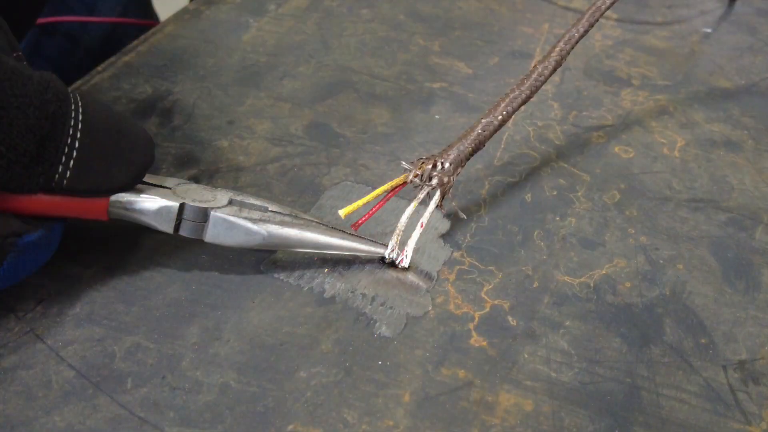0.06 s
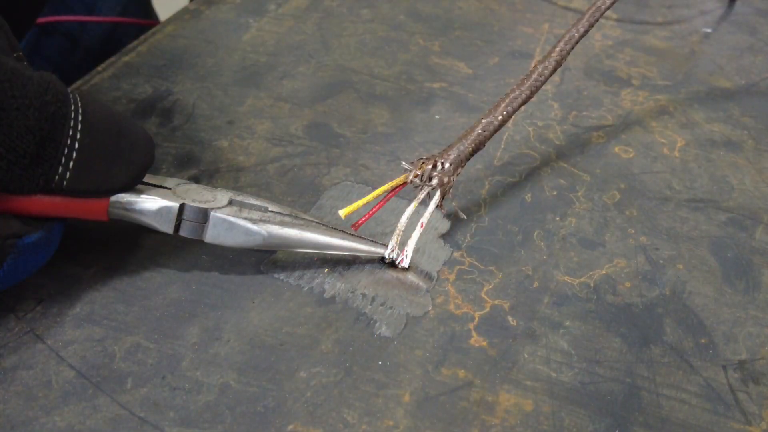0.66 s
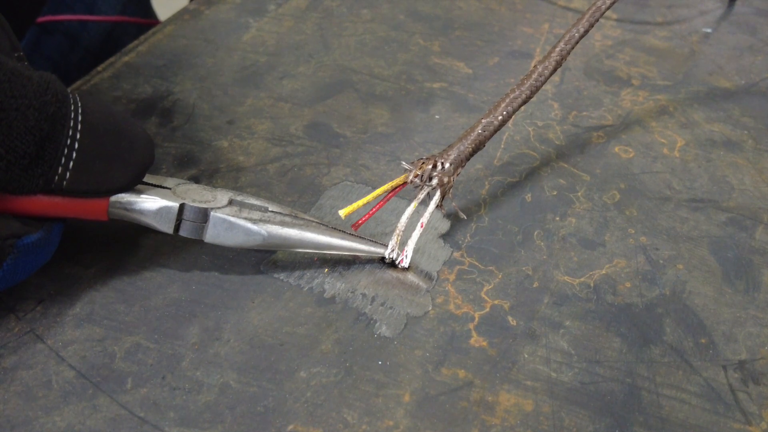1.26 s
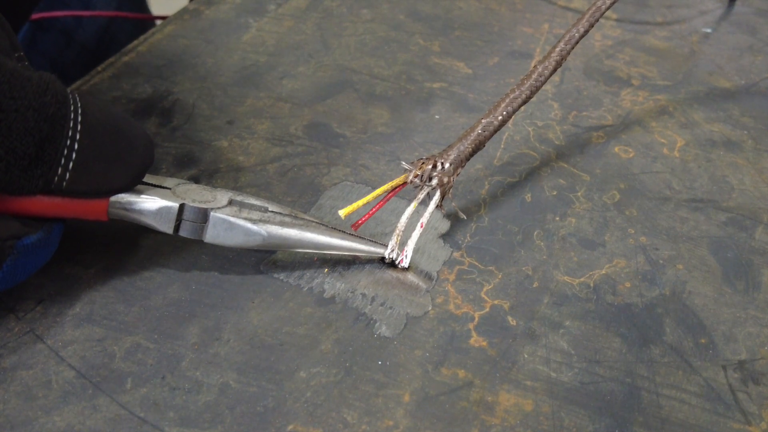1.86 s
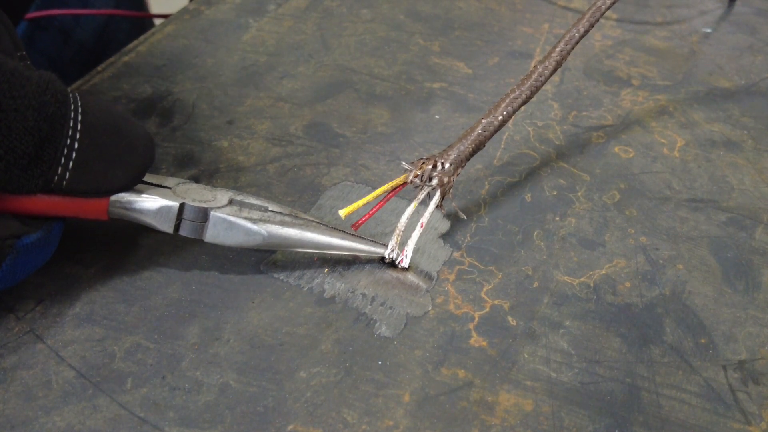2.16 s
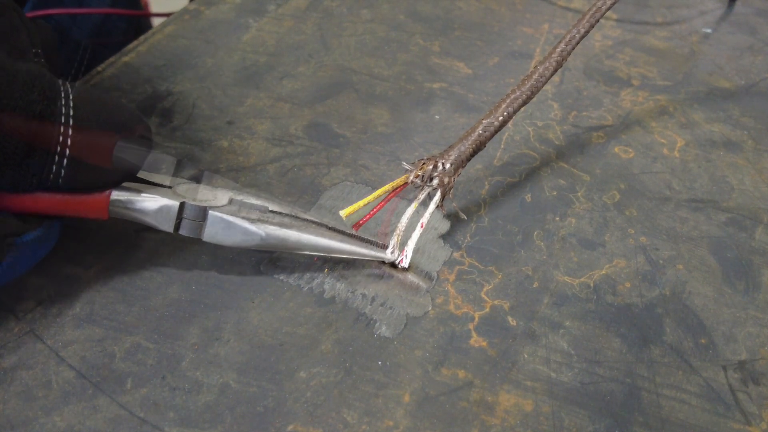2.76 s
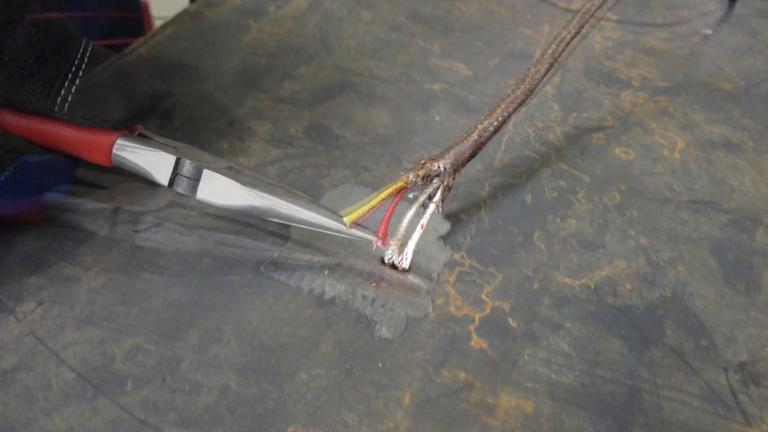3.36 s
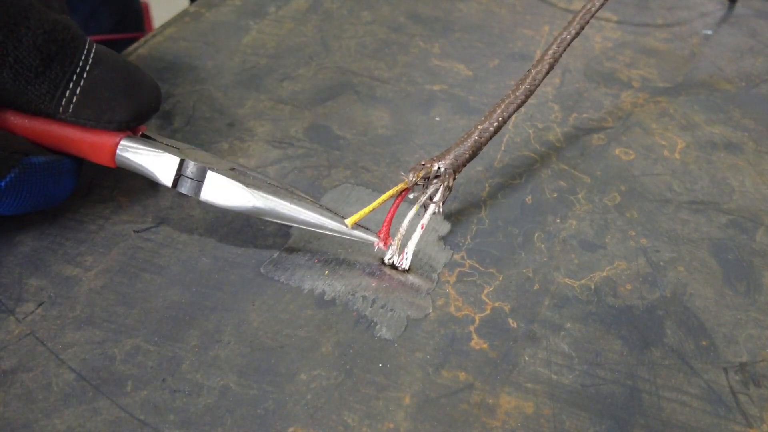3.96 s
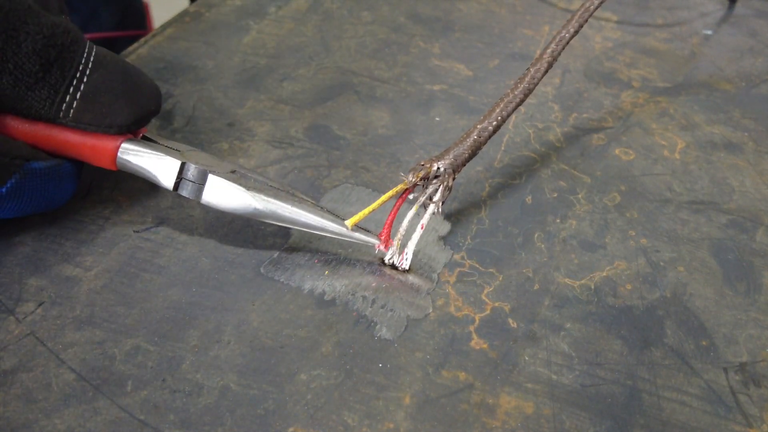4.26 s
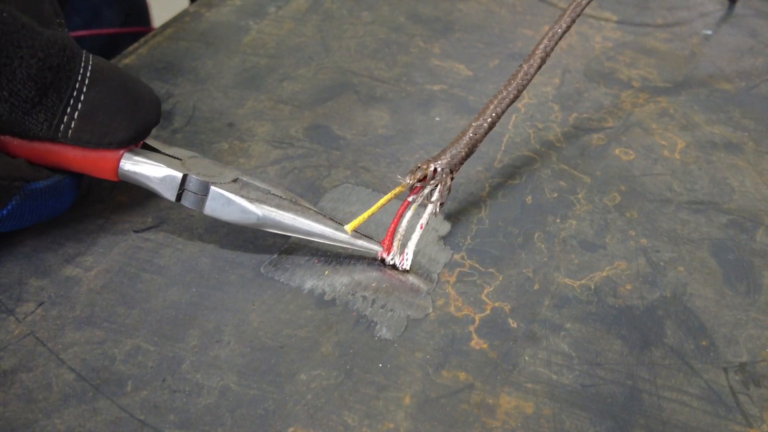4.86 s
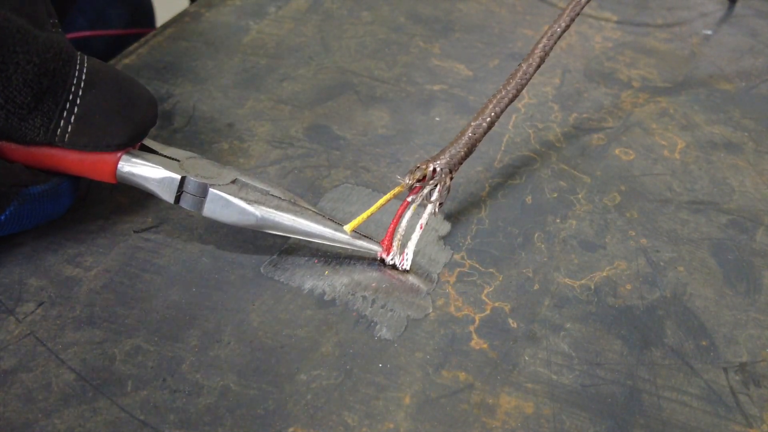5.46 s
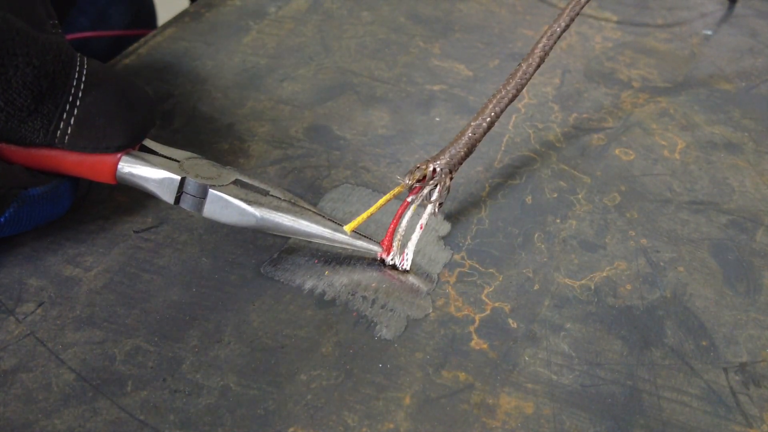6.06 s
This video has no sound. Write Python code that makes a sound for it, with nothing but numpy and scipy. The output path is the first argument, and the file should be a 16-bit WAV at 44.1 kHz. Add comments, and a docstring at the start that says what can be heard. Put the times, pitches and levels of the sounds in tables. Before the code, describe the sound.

The sound opens on the echo of a welder's crack, without the crack itself, dying away in a workshop within about a second. Underneath, a fan and other machines keep up a steady low rumble and hum with a soft rush of air throughout. From about 1.5 to 3.2 seconds the welder's charger gives a very faint, thin, high whine. At 2.9 seconds steel pliers release a wire close by with a sharp click, the most prominent sound, and a brief scraping hiss. Two lighter, brighter clicks follow at about 3.5 and 3.7 seconds as the jaws grip the next wire, with faint rubbing. The fan carries on almost alone until about 5.4 seconds, when the wire is pressed onto a steel plate: a soft, short ringing tone swells, with a tiny high metallic squeak at 5.5 seconds, and fades into the hum by 6 seconds.

```python
"""A capacitor discharge welder has just fired: its crack reverberates and dies away in a workshop.
The charger's coil whines faintly while the capacitors refill. Steel pliers let go of the welded wire
and grip the next: impacts excite their modes as clicks, and friction hisses. They set the wire on a
steel plate, which hums as stick-slip motion makes a small ringing squeak. Under it all a fan rumbles,
rushes and hums at multiples of its turning rate, beside the tones of other machines."""
import sys
import numpy as np
from scipy import signal
from scipy.fft import rfft, irfft, next_fast_len
from scipy.io import wavfile
from scipy.ndimage import map_coordinates

SR = 44100
rng = np.random.default_rng(int(sys.argv[2]) if len(sys.argv) > 2 else 0)


def store_wav(level_fs):
    """Save 16-bit WAV to argv[1]."""
    pcm = np.round(np.clip(np.atleast_2d(level_fs), -1, 1) * 32767)
    wavfile.write(sys.argv[1], SR, pcm.T.astype(np.int16))


N = 274302

# spectra of the fan's rumble and of its rushing air: frequency_hz, relative_density_db
RUMBLE_SPECTRUM = [(10, -36), (20, 3.5), (42, 1), (56, -4.5), (72, -8.5), (86, -1), (112, -3), (135, -8.5),
                   (225, -8), (320, -14.5), (410, -18), (490, -16.5), (590, -22), (700, -67.5)]
AIR_SPECTRUM = [(550, 2.5), (715, 6.5), (830, 4), (1020, 3), (1100, 5), (1230, 2.5), (1830, -0.5),
                (2250, -12), (2850, -10), (3400, -16.5), (4700, -18), (8000, -23), (12000, -30),
                (13200, -60), (16000, -45)]
# stereo width of room noise: frequency_hz, side_minus_mid_db
ROOM_WIDTH = [(40, -17), (100, -30.5), (200, -7), (400, -7), (620, -2), (900, 4), (1130, 4), (1230, -9),
              (1800, -7), (2600, -2.5), (3500, 0.5), (6000, 0.3), (15000, 2)]
# balance of room noise: frequency_hz, left_minus_right_db
ROOM_BALANCE = [(45, -1), (125, 0.5), (500, 2.5), (1000, 4), (2000, 0.5), (12000, 0.5)]
# harmonics of the fan's rotation; five blades favour the fifth: multiple, level_db, left_minus_right_db
FAN_HARMONICS = [(1, -46, -0.5), (3, -63.5, -3.5), (5, -54, 2.5), (10, -71, 10), (15, -80.5, 10.5)]
# tones of other machines: pitch_hz, level_db, left_minus_right_db
MACHINE_TONES = [(21.7, -47.5, 2), (37.9, -46.5, -.5), (81.75, -55, -0.5), (92.8, -54.5, 5),
                 (110.6, -61, -1.5), (291.3, -65.5, 2), (1797, -78, -3)]
# strokes of glove, jaws and wire: peak_s, rise_s, fall_s, level_db, centre_hz, spread_octaves
FRICTION_STROKES = [(1.868, .022, .025, -76, 12000, .9), (2.2, 0.45, 0.46, -86, 8000, 2.5),
                    (2.56, .025, 0.028, -68, 9500, 1.7), (2.75, 0.33, 0.4, -76.5, 10000, 1.6),
                    (2.926, 0.024, 0.021, -60.5, 5000, 2.4), (2.949, 0.026, 0.022, -50.5, 1250, 0.85),
                    (2.987, 0.035, 0.024, -50.5, 10000, 1.4), (3.15, 0.065, 0.013, -67.5, 9000, 2.4),
                    (3.545, 0.025, 0.05, -71.5, 10000, 2.3), (3.6, 0.41, 0.2, -79, 8500, 1.2),
                    (4.59, .025, .02, -79, 10000, .6), (5.43, 0.45, 0.19, -72.5, 12500, 2.1),
                    (5.46, 0.028, 0.032, -58.5, 1360, 0.35), (5.51, 0.0032, .006, -56, 12000, .8),
                    (5.71, 0.12, 0.22, -70.5, 8000, 2.5)]
# modes of the gripped pliers and of the plate under them: pitch_hz, relative_db, t60_s
PLIER_MODES = [(2380, 3, .012), (2640, 2, .009), (4580, 1, .008), (4940, 1, .013), (5700, -9, .014),
               (6350, -3, .013), (7700, 2.5, .014), (8500, -3, .015), (9700, -3, .014), (10700, -2, .014),
               (12700, -3, .012), (14200, -4, .012), (15300, -6, .012)]
PLATE_MODES = [(656, 11.6, 0.028), (1216, 4.5, 0.03), (1420, 8.7, 0.034), (1730, 4, 0.017)]
# impacts of pliers and wire: start_s, level_db, centre_hz, spread_octaves, snap_gain_db,
# knock_gain_db, rebound_delay_s, rebound_gain_db
IMPACTS = [(.432, -69, 11500, .8, 0, -17, .003, -8), (1.195, -65, 5800, .55, 7, -20, .003, -8),
           (2.9215, -29, 3200, .66, -18, -23, .0035, -9), (2.9216, -40, 14500, .25, 6, -20, .002, -12),
           (3.301, -62, 10000, 1, 6, -20, .003, -6), (3.451, -35, 7000, .55, 0, -16, .0025, -11),
           (3.6465, -37.5, 7900, .85, 5, -10.5, .0024, -5)]
# the plate's mode that hums under the wire: pitch_hz, level_db, t60_s
PLATE_HUM_MODES = [(615, -42.5, 0.43)]
# partials of the squeak: multiple, level_db, jitter_fraction
SQUEAK_PARTIALS = [(2, -61, .08), (3, -50, .026), (4.42, -65.5, .035), (5.1, -66, .03), (6, -66, .03),
                   (6.85, -69, .04)]
# tones of the charger: start_s, end_s, pitch_hz, midway_level_db, growth_db_per_s,
# left_minus_right_db, left_lead_turns, lead_swing_turns
CHARGER_TONES = [(1.26, 1.62, 5028, -88.5, 0, 1, .05, 0), (1.58, 3.17, 5597, -78, -1, 4, .49, .42),
                 (1.62, 3.17, 11194, -84.5, 3.5, -.5, .69, 0)]
# spectrum of the crack's echo: frequency_hz, relative_density_db
ECHO_SPECTRUM = [(150, 11.5), (400, 7.5), (700, -2), (1100, -1), (1400, 3), (1650, -3.5), (1900, 2.5),
                 (2250, -4), (2950, 3.5), (3500, -1), (4300, 1.5), (7500, -2.5), (10000, -5.5),
                 (13000, -7.5), (16000, -13)]
# reverberation time of the workshop: frequency_hz, t60_s
WORKSHOP_T60 = [(200, 0.4), (1500, 2), (3000, 1.33), (5000, 0.88), (8000, 0.67), (12000, 0.55),
                (16000, 0.53)]
# brief dips in the overall level: lowest_s, depth_db, sink_s, recover_s
LEVEL_DIPS = [(0.022, 16, 0.015, 0.046), (3.18, 4, 0.017, 0.2)]


def amp(db):
    """Amplitude ratio of a level in decibels."""
    return 10 ** (np.asarray(db) / 20)


def unit(x):
    """Normalisation to rms 1."""
    return x / np.sqrt(np.mean(x ** 2) + 1e-20)


def along(points, hz):
    """Interpolation of (frequency_hz, value) points on a logarithmic frequency axis."""
    frequencies, values = np.transpose(points)
    return np.interp(np.log(hz + 1), np.log(frequencies + 1), values)


def clock():
    """The time of every sample in seconds."""
    return np.arange(N) / SR


def wobble(rate_hz):
    """Smooth random modulation: a spline through rate_hz Gaussian values a second."""
    return map_coordinates(rng.standard_normal(int(N * rate_hz / SR) + 4), [clock() * rate_hz])


def bump(t, rise_s, fall_s):
    """A Gaussian envelope of height 1 at t = 0, with separate rise and fall."""
    return np.exp(-np.minimum((t / np.where(t < 0, rise_s, fall_s)) ** 2, 20))


def filtered(x, response):
    """Linear filtering: the spectrum of x is multiplied by a frequency response."""
    n = x.shape[-1]
    padded = next_fast_len(n + SR // 5)
    return irfft(rfft(x, padded) * response(np.fft.rfftfreq(padded, 1 / SR)), padded)[..., :n]


def band(hz, centre_hz, octaves):
    """A Lorentzian bell on the logarithmic frequency axis."""
    return 1 / (1 + (np.log2((hz + 1) / centre_hz) / octaves) ** 2)


def pan(db):
    """Left and right gains for a level difference."""
    return amp(np.array([[.5], [-.5]]) * db)


def add(out, start_s, sound):
    """Superposition of a stereo sound onto out at start_s."""
    part = out[:, max(round(start_s * SR), 0):][:, :sound.shape[1]]
    part += sound[:, :part.shape[1]]


def ring(modes, t):
    """Free vibration: damped modes of random phase, a quarter cycle apart at the two microphones."""
    out = np.zeros((2, len(t)))
    for hz, db, t60 in modes:
        lead_turns = rng.choice([-1, 1]) * np.array([[0], [1 / 4]])
        out += amp(db - 60 * t / t60) * np.sin(2 * np.pi * (hz * t + rng.random() + lead_turns))
    return out


def room_noise(spectrum):
    """A noise field of rms 1: coherent between the microphones in the bass, diffuse in the treble."""
    def mid_side_gains(hz):
        width = amp(along(ROOM_WIDTH, hz))
        return amp(along(spectrum, hz)) * np.array([np.ones_like(hz), width]) / np.hypot(1, width)
    mid, side = filtered(rng.standard_normal((2, N)), mid_side_gains)
    left_right = np.array([mid + side, mid - side])
    return unit(filtered(left_right, lambda hz: pan(along(ROOM_BALANCE, hz))))


def reflections(x, wet_db, t60):
    """Convolution adds an exponentially decaying diffuse tail off the bench and nearby walls."""
    t = np.arange(SR // 2) / SR
    tail = rng.standard_normal((2, len(t))) * amp(-60 * t / t60)
    return x + amp(wet_db) * signal.fftconvolve(x, tail / np.linalg.norm(tail[0]), axes=1)[:, :N]


def fan_and_machines(rotation_hz=48.12, rumble_db=-42.5, air_db=-59.0, flutter_db=2):
    """Broadband flow noise, and tones whose phase the moving air modulates, the high ones most."""
    out = amp(rumble_db) * room_noise(RUMBLE_SPECTRUM)
    out += amp(air_db + 1.02 * wobble(6.1)) * room_noise(AIR_SPECTRUM)
    fan_tones = [(multiple * rotation_hz, db, lean_db) for multiple, db, lean_db in FAN_HARMONICS]
    for hz, db, lean_db in fan_tones + MACHINE_TONES:
        drift_turns = (0.043 + .00025 * hz) * wobble(4)
        turns = hz * clock() + drift_turns + rng.random()
        out += pan(lean_db) * amp(db + flutter_db * wobble(5)) * np.sqrt(2) * np.sin(2 * np.pi * turns)
    return out


def rubbing(grain_db=1.0, uneven_db=0.7, lean_db=2):
    """Sliding friction of glove, jaws and wire: each stroke is a grainy hiss that swells and fades."""
    out = np.zeros((2, N))
    t = np.arange(2 * SR) / SR - 1  # a second to either side of the stroke's peak
    for peak_s, rise_s, fall_s, db, centre_hz, octaves in FRICTION_STROKES:
        hiss = unit(filtered(rng.standard_normal((2, len(t))), lambda hz: band(hz, centre_hz, octaves)))
        add(out, peak_s - 1, amp(db) * hiss * bump(t, rise_s, fall_s))
    return pan(lean_db) * out * amp(grain_db * wobble(400) + uneven_db * wobble(19))


def impact(centre_hz, octaves, snap_db, knock_db, attack_s=.0002, crest_db=7):
    """Impulsive excitation: a noise burst, a band of the pliers' modes and a knock of the plate."""
    t = np.arange(SR // 5) / SR
    # a hard crack, a brief snap, then their scatter off the bench
    crack_t60, snap_t60, scatter_t60 = .004, .018, .1
    decay = amp(8 - 60 * t / crack_t60) + amp(-60 * t / snap_t60) + amp(-22 - 60 * t / scatter_t60)
    ringing = (1 - np.exp(-t / attack_s)) * ring(PLIER_MODES, t)
    burst = amp(snap_db) * decay * rng.standard_normal((2, len(t)))
    click = filtered(ringing + burst, lambda hz: band(hz, centre_hz, octaves) ** 2)
    nominal_peak = amp(crest_db) * click[:, :SR // 500].std()  # from the rms of the first 2 ms
    return click / nominal_peak + amp(knock_db) * ring(PLATE_MODES, t) / 2


def plier_clicks(lean_db=-1.5):
    """Inelastic collision: each impact rebounds once, weaker, lower, broader and with more plate in it."""
    out = np.zeros((2, N))
    for start_s, db, centre_hz, octaves, snap_db, knock_db, rebound_s, rebound_db in IMPACTS:
        add(out, start_s, amp(db) * impact(centre_hz, octaves, snap_db, knock_db))
        rebound = impact(0.85 * centre_hz, 1.2 * octaves, snap_db, knock_db + 3)
        add(out, start_s + rebound_s, amp(db + rebound_db) * rebound)
    return pan(lean_db) * out


def plate_hum(start_s=5.44, swell_s=0.032):
    """Resonance: a mode of the plate swells and decays as the wire is pressed onto it."""
    t, out = np.arange(SR // 2) / SR, np.zeros((2, N))
    swell = 1 - np.exp(-t / swell_s)
    add(out, start_s, np.sqrt(2) * swell * ring(PLATE_HUM_MODES, t))
    return out


def wire_squeak(start_s=5.512, rise_s=.004, hold_s=.011, t60=.1, rough_db=2.5):
    """Stick-slip of steel on steel: rough partials sag together as the wire slows, then ring out."""
    start_hz, end_hz, glide_s = 1282, 1222, .005
    t, out = clock() - start_s, np.zeros((2, N))
    slowed = (1 + np.tanh((t - hold_s / 2) / glide_s)) / 2
    pitch_hz = start_hz + (end_hz - start_hz) * slowed
    attack = np.exp(-(np.minimum(t, 0) / rise_s) ** 2)
    release = amp(-60 * np.maximum(t - hold_s, 0) / t60)
    for multiple, db, jitter in SQUEAK_PARTIALS:
        turns = np.cumsum(multiple * pitch_hz * (1 + jitter * wobble(1200))) / SR + rng.random()
        lead_turns = rng.choice([-1, 1]) * np.array([[0], [1 / 5]])
        out += amp(db + rough_db * wobble(300)) * np.sqrt(2) * np.sin(2 * np.pi * (turns + lead_turns))
    return attack * release * out


def charger_whine(waver_db=.5, flutter_db=1.5, switch_s=.03, swing_s=2.18):
    """Forced vibration: the converter's coil sings thin tones, out of phase at the two microphones."""
    t, out = clock(), np.zeros((2, N))
    swing = bump(t - swing_s, rise_s=.15, fall_s=.15)  # a brief shift of the phase difference
    for start_s, end_s, hz, db, growth_db_per_s, lean_db, lead_turns, swing_turns in CHARGER_TONES:
        running = np.clip(np.minimum(t - start_s, end_s - t) / switch_s, 0, 1)
        trend_db = db + growth_db_per_s * (t - (start_s + end_s) / 2)
        level_db = trend_db + waver_db * wobble(5.1) + flutter_db * wobble(50)
        turns = hz * t + np.array([[.5], [-.5]]) * (lead_turns + swing_turns * swing)
        out += pan(lean_db) * amp(level_db) * running * np.sqrt(2) * np.sin(2 * np.pi * turns)
    return out


def weld_echo(level_db=-35.0, build_cycles=42):
    """Reverberation of the welder's crack: the bass builds up slowest and the midrange lasts longest."""
    hz, t, spectra = signal.stft(room_noise(ECHO_SPECTRUM), SR, nperseg=256)
    build = 1 - np.exp(-t * hz[:, None] / build_cycles)
    decay = amp(-60 * t / along(WORKSHOP_T60, hz)[:, None])
    _, tail = signal.istft(spectra * build * decay, SR, nperseg=256)
    return amp(level_db) * tail[:, :N]


def scene():
    """Superposition of every source heard at the bench."""
    squeak = reflections(wire_squeak(), wet_db=-12.5, t60=.24)
    clicks = reflections(plier_clicks(), wet_db=-22.5, t60=0.45)
    return fan_and_machines() + weld_echo() + charger_whine() + rubbing() + plate_hum() + clicks + squeak


def record(dry):
    """Gain modulation and band limiting: the level dips at the opening and midway; the top is cut off."""
    cutoff_hz = 15800
    dip_db = sum(depth_db * bump(clock() - lowest_s, sink_s, recover_s)
                 for lowest_s, depth_db, sink_s, recover_s in LEVEL_DIPS)
    return filtered(dry * amp(-dip_db), lambda hz: hz < cutoff_hz)


dry = scene()
out = record(dry)
store_wav(out)
```